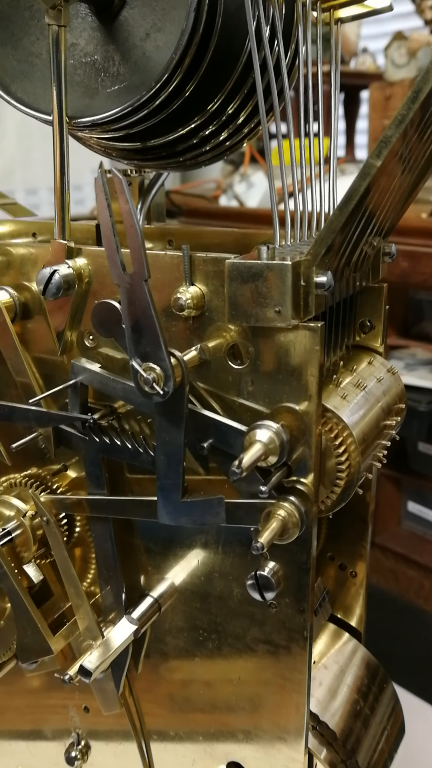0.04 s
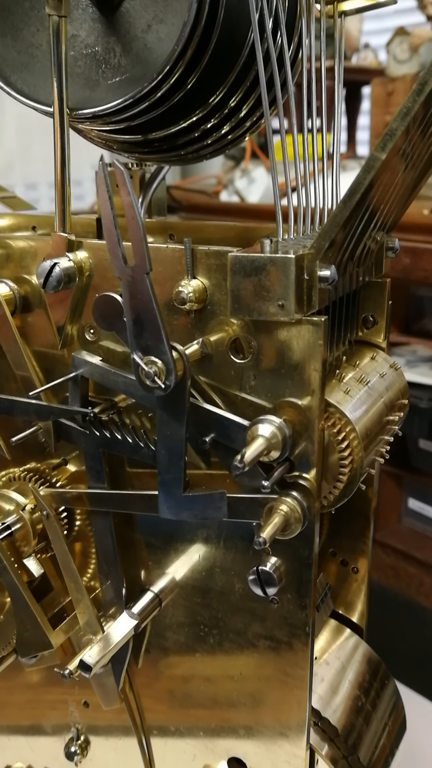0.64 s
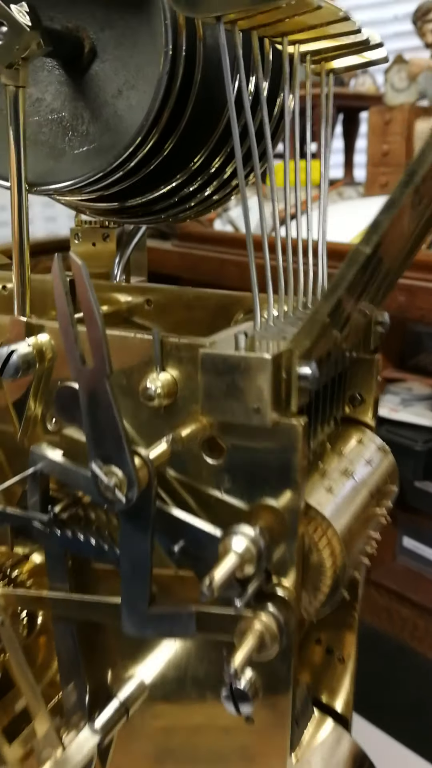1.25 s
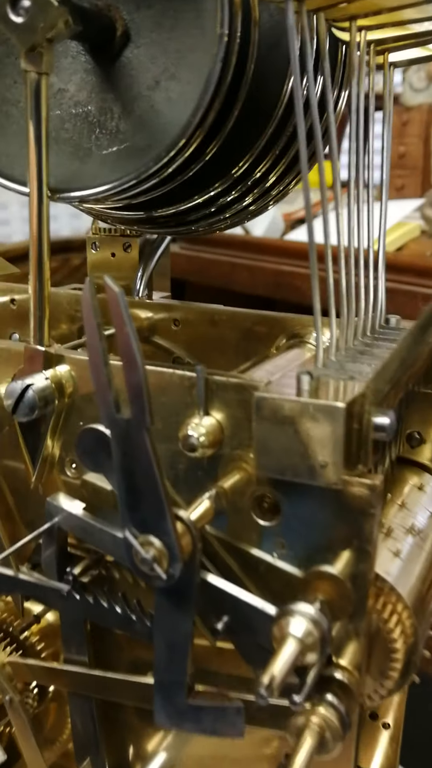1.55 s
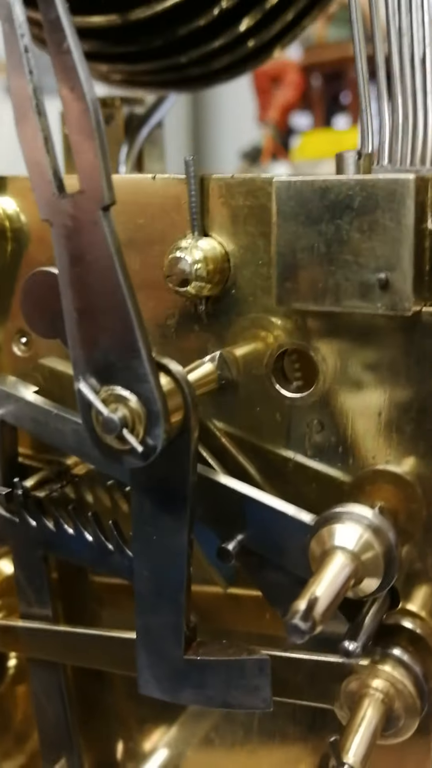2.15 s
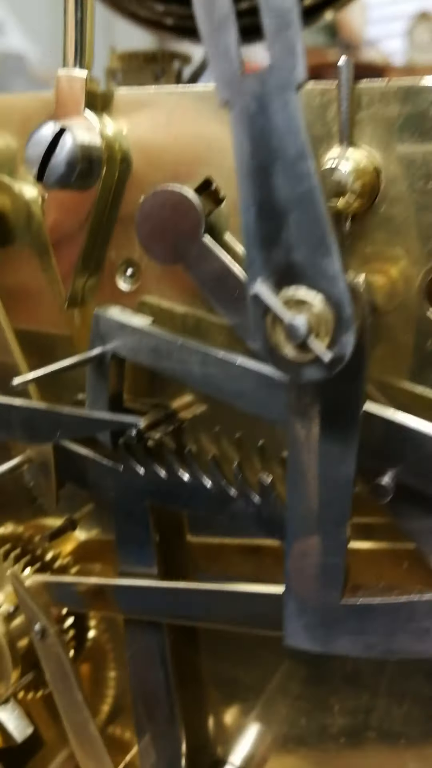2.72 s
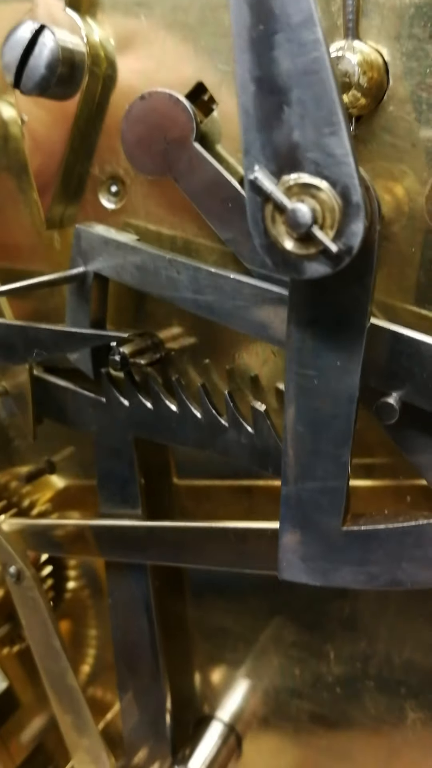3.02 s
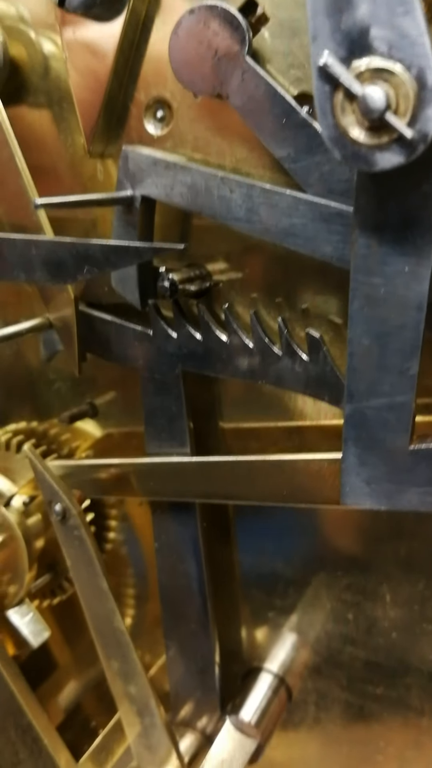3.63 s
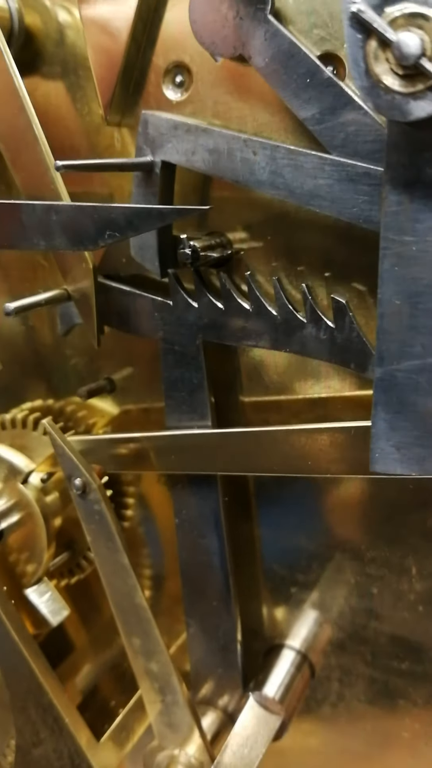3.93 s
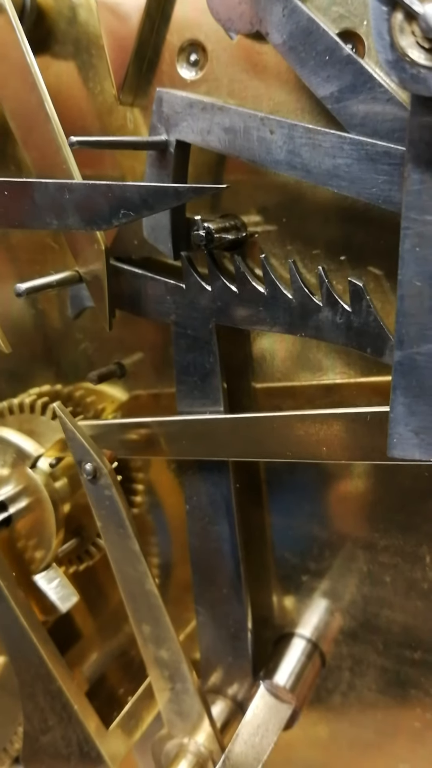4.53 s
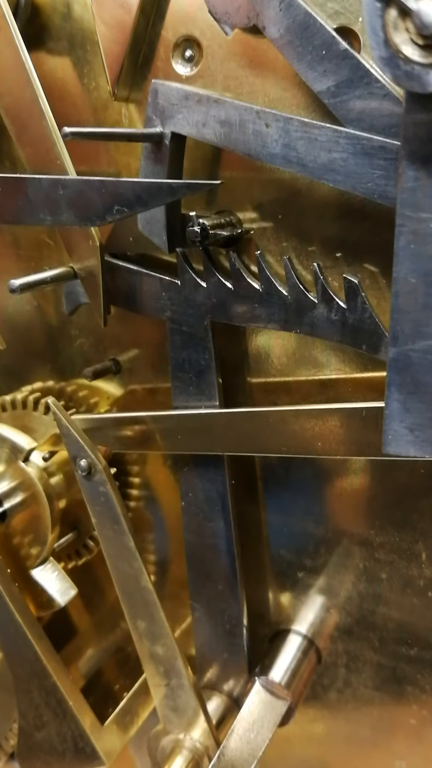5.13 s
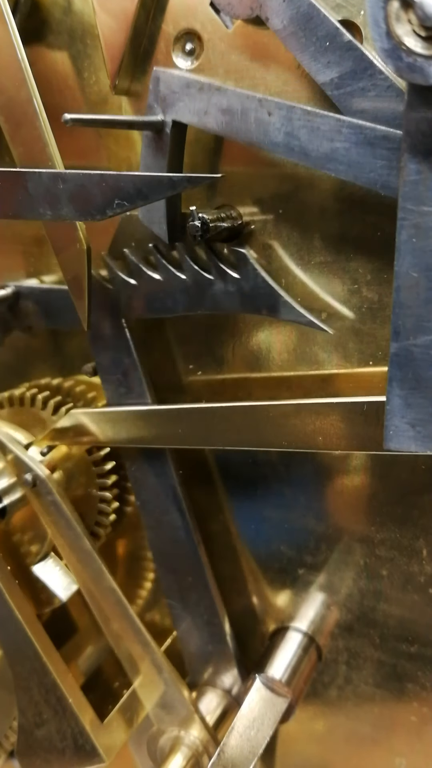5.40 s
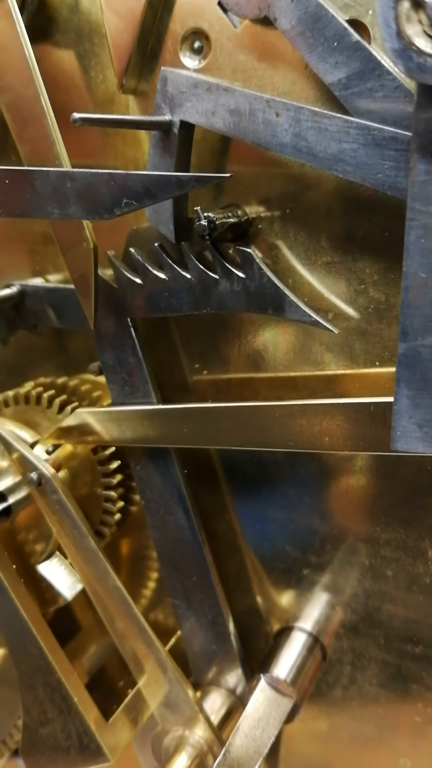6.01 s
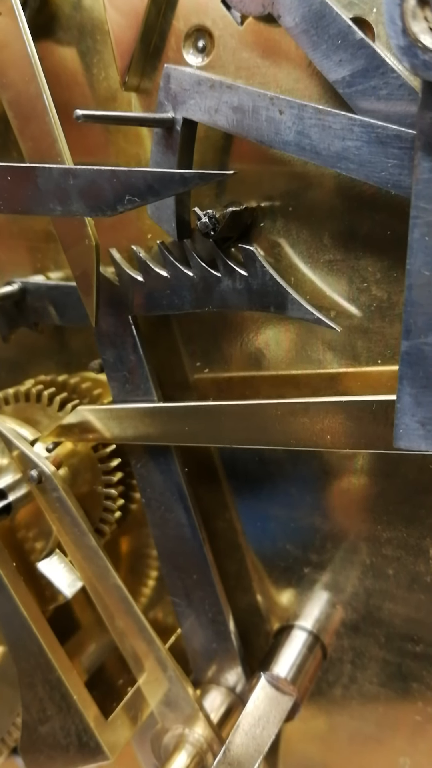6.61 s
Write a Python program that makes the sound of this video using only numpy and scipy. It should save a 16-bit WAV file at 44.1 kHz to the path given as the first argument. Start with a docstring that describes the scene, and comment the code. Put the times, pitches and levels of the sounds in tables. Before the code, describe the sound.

Close, slightly uneven tick and tock from a mechanical clock movement runs throughout, over the soft rumble, hiss and faint hum of a quiet workshop. A hand brushes the microphone and bumps it lightly several times. Then comes the loudest event, a hard steel clack and a brief ringing rattle as a part falls and bounces. Very quiet whirring gears and two smaller metallic clicks follow.

```python
"""A brass chiming-clock movement ticks on a bench in a quiet workshop, a hand's width from the microphone.
Each tooth of the escape wheel rings a pallet and rattles the plates and levers. The microphone moves in
on the steel rack, which is released, drops and bounces; the wheel train spins up with its whirring fly
and two levers click over. The hand holding the stereo microphone slides and knocks softly on its case.
Behind it all lie the room's low rumble, hiss and a faint mains hum."""
import sys
import numpy as np
from scipy import signal
from scipy.fft import rfft, irfft, next_fast_len
from scipy.io import wavfile

SR = 44100
rng = np.random.default_rng(int(sys.argv[2]) if len(sys.argv) > 2 else 0)


def waveform_to_disk(signal):
    """Save audio, clipped to [-1, 1], as 16-bit WAV at the path in sys.argv[1]."""
    frames = np.transpose(np.atleast_2d(signal))
    scaled = np.clip(frames, -1, 1) * 32767
    samples = np.round(scaled).astype(np.int16)
    wavfile.write(sys.argv[1], SR, samples)


N = 298116
TIME = np.arange(N) / SR
AGE = TIME[:SR // 2]  # seconds since a blow

# the lifting lever clicks over: start_s, level_db, pan_db, tilt_db_per_octave, t60_s
LIFTING_CONTACT = [(6.2450, -30, 3.0, 0.3, 0.03)]


def escapement():
    """Tick and tock alternate, slightly out of beat; the two pallets shake the same parts unequally."""
    # how hard the tooth lands on the entry (tick) and exit (tock) pallet, swing by swing: force_db
    tick_forces = [2.5, -10.5, 0, 1.5, -1, 0, -1.5]
    tock_forces = [-2, -1, 2, 0.5, -1, -1, -8]
    # plate rattle after each pallet: frequency_hz, level_db
    tick_rattle = [(700, -13), (1700, -2), (2120, 4.5), (2700, -15), (3250, -8.5), (3850, 17), (4450, -7),
                   (5850, -2), (6450, -16.5), (7200, 3), (8200, -3), (11000, -3), (13200, -7), (15000, -5),
                   (15800, -17)]
    tock_rattle = [(700, -5), (1450, 8), (1800, -1), (2280, 5), (2750, -9.5), (3500, 2), (3960, 7.5),
                   (4450, -8), (5900, 5), (6400, -14), (7100, -0.5), (10500, -3), (12800, -3), (13700, -15),
                   (15000, -8), (15800, -25)]
    # modes of the steel levers and of freely hanging parts: pitch_hz, tick_db, tock_db, t60_s
    lever_modes = [(850, -67, -68, 0.3), (1415, -75, -63, 0.28), (2040, -78, -61, 0.22),
                   (2131, -57.5, -61, 0.12), (2293, -63.5, -54, 0.056), (4000, -54.5, -59.5, 0.22),
                   (5770, -51.5, -63, 0.11), (5857, -46.5, -46.5, 0.11), (7120, -63, -61, 0.17),
                   (7370, -64, -61, 0.16), (8700, -62, -59, .1), (9460, -62.5, -66, 0.25),
                   (9520, -56, -61, 0.12), (10140, -66, -77, .16), (10480, -61, -53, 0.11),
                   (10800, -55, -56, 0.071), (11500, -72, -66, 0.16), (11980, -66, -56, .08),
                   (12200, -60, -71, 0.11), (12660, -70, -57, 0.12), (13058, -49, -61, 0.11),
                   (13430, -60, -68, 0.092), (14210, -71, -62, 0.12), (14490, -62, -80, .14),
                   (15110, -65, -63, 0.12)]
    hanging_modes = [(169.6, -56.5, -63, 0.69), (5770, -58, -63, 0.35)]
    short, long = np.array(lever_modes), np.array(hanging_modes)
    tick_columns, tock_columns = [0, 1, 3], [0, 2, 3]
    first_tick_s, tock_after_s = .4503, .4688
    tick = beats(first_tick_s, tick_forces, tick_rattle, short[:, tick_columns], long[:, tick_columns],
                 late_s=.0028, ring_db=-24.5, pan_db=-16, rattle_db=-46.8, rattle_t60=.1,
                 rebound_s=.008, rebound_db=-5.5, spring_db=-4, close_spring_db=-3)
    tock = beats(first_tick_s + tock_after_s, tock_forces, tock_rattle,
                 short[:, tock_columns], long[:, tock_columns],
                 late_s=0, ring_db=-38.5, pan_db=-11, rattle_db=-53, rattle_t60=.12,
                 rebound_s=.012, rebound_db=-4.5, spring_db=-2, close_spring_db=13.5)
    return tick + tock


def beats(first_s, forces_db, rattle_colour, lever_modes, hanging_modes, late_s, ring_db, pan_db,
          rattle_db, rattle_t60, rebound_s, rebound_db, spring_db, close_spring_db, swing_s=.9604):
    """Once a pendulum swing a tooth rings the pallet; the blow spreads through plates and levers."""
    # the microphone moves in on the rack: time_s, closeness (0 to 1)
    approach = [(1.5, 0), (3.7, .65), (4.5, 1)]
    # a thin return spring: pitch_hz, level_db, t60_s
    spring_mode = [(4770, -68, .36)]
    out = np.zeros((2, N))
    landing = decay(rattle_t60, rise_s=.0012)
    rebound = from_db(rebound_db) * np.interp(AGE - rebound_s, AGE, landing)
    envelope = np.hypot(landing, rebound) + from_db(-19.5) * decay(.35, rise_s=.0076)
    for swing, force_db in enumerate(forces_db):
        s = first_s + swing * swing_s + late_s * (swing % 2)  # uneven wheel: every second tooth is late
        close = np.interp(s, *np.transpose(approach))
        pallet = from_db(ring_db + force_db) * panned(pan_db) * pallet_ring(rebound_s, rebound_db)
        # each part follows the force and the microphone's closeness to its own degree
        plates = noise(rattle_colour, len(AGE)) * envelope
        plates *= from_db(rattle_db + .25 * force_db + 2.5 * close)
        clink = ring(lever_modes, rise_s=.0035, scatter_db=2.2)
        clink *= from_db(-.8 + .6 * force_db + 2.5 * close)
        hanging = ring(hanging_modes, rise_s=.012, scatter_db=2.5)
        hanging *= from_db(1.8 + .9 * force_db - 7.5 * close)
        spring = ring(spring_mode, rise_s=.009, scatter_db=0)
        spring *= from_db(spring_db + force_db + close_spring_db * close ** 3)
        add(out, s, pallet + panned(-1) * (plates + clink + hanging + spring))
    return out


def pallet_ring(rebound_s, rebound_db):
    """A tooth lands on the pallet and rebounds once, which makes the short ring throb."""
    # the pallet's own modes: pitch_hz, level_db, t60_s
    modes = [(3968, 2, 0.037), (3866, -10.5, 0.045)]
    first = ring(modes, rise_s=.0044, scatter_db=-.54, phase_spread=0)
    second = np.pad(first, ((0, 0), (int(rebound_s * SR), 0)))[:, :len(AGE)]
    damping = np.exp(-np.maximum(AGE - rebound_s, 0) / .0015)  # the second contact stops the first ring
    return first * damping + from_db(rebound_db) * second


def rack():
    """The light hook slips off with a hard clack; the heavy rack lands and shakes the whole movement."""
    # the hook lets go: start_s, level_db, pan_db, tilt_db_per_octave, t60_s
    release = [(5.4143, -10.7, 1, 1.3, 0.018), (5.4155, -14, -4, -0.5, 0.015)]
    # the crack of each part: frequency_hz, level_db
    hook_colour = [(150, -34), (1100, -19), (1500, 1), (2250, 0), (2700, -5), (3300, -6), (4200, -19),
                   (5400, -16.5), (7000, -0.5), (8400, 2), (9800, -2.5), (11000, -18), (13500, -14),
                   (15300, -18)]
    rack_colour = [(150, -35), (500, -17.5), (1000, -1), (1550, -7), (2450, 4), (2800, -3.5), (3300, -0.5),
                   (5400, -7), (7000, -2.5), (9000, 2), (11000, -7.5), (13500, -5.5), (15000, 0),
                   (16000, -10)]
    # what each part sets ringing: pitch_hz, level_db, t60_s
    hook_modes = [(1500, -8.5, .04), (2060, -6.5, 0.037), (2296, -5, .035), (3250, -13, 0.06),
                  (6900, -11, .03), (8300, -4, .035), (9080, -12, 0.036)]
    rack_modes = [(254, -31.5, 0.69), (298, -32, 0.3), (650, -30.5, 0.35), (870, -27, .16),
                  (1005, -27, .25), (1059, -25, .2), (1378, -29, 0.73), (1493, -25.5, .13),
                  (1570, -25, 0.18), (1480, -22, 0.14), (1625, -21.5, .16), (1710, -24, .16),
                  (1981, -18.5, .16), (2020, -19, .15), (2430, -20, .12), (2485, -17, .13),
                  (2700, -23, .12), (2840, -25, .14), (3140, -27, .14), (3260, -27, 0.13), (3340, -21, .16),
                  (3700, -22, .15), (3876, -19, .11), (6500, -28, .14), (7100, -21, .12), (7400, -31, .12),
                  (8200, -27, .13), (7880, -20, .13), (9055, -16.5, .1), (11520, -23, .11),
                  (15080, -16, .07)]
    hook = strike(release, hook_colour, hook_modes, frame_db=-24.5, modes_db=-8.5, bench_db=-55)
    drop = strike(bounces(), rack_colour, rack_modes, frame_db=-18.5, modes_db=-7, bench_db=-28)
    return hook + drop


def bounces(graze_lead_s=.0027, chatter_gap_s=.0125, chatter_loss_db=13.5):
    """At each landing a pin grazes, the rack hits and loose parts chatter; then it shivers to rest."""
    # the rack lands: start_s, level_db
    landings = [(5.4391, -13.8), (5.4818, -17.4), (5.5283, -23)]
    first_db = landings[0][1]
    settle_s, settle_gap_s = 5.548, .0055
    contacts = []
    for s, db in landings:
        graze_db = first_db - 9.5 + 1.8 * (db - first_db)  # a softer landing is grazed far more softly
        contacts.append(contact(s - graze_lead_s, graze_db, t60=.028, tilt_db=1.6, pan_db=1.5))
        contacts.append(contact(s, db, t60=.026, tilt_db=-.2, pan_db=.6))
        for k in (1, 2):
            contacts.append(contact(s + k * chatter_gap_s, db - k * chatter_loss_db, t60=.02, tilt_db=.8))
    shiver = [contact(settle_s + k * settle_gap_s, db=-33, t60=.05, tilt_db=-.8) for k in range(5)]
    return contacts + shiver


def contact(s, db, t60, tilt_db, pan_db=0):
    """One touch of steel on steel, as a row for strike()."""
    return s, db, pan_db, tilt_db, t60


def strike(contacts, colour, modes, frame_db, modes_db, bench_db):
    """Steel hits steel: a hard crack, then the frame rings on and the bench under it booms."""
    # the shaken frame and the bench: frequency_hz, level_db
    frame_colour = [(90, -28.5), (170, -15), (260, -2), (480, -13.5), (750, -12.5), (1020, 2),
                    (1250, -10.5), (1550, 6), (2300, -2), (3400, 3.5), (5300, -8.5), (8500, -2.5),
                    (11500, -13.5), (15500, -19.5)]
    bench_colour = [(70, -41), (170, -4.5), (290, -4.5), (450, -10.5), (800, -13.5), (1600, -16.5),
                    (4000, -20.5), (15000, -47)]
    # left against right: frequency_hz, correlation
    crack_likeness = [(500, .52), (2200, .45), (5000, .11), (13000, -.26)]
    frame_likeness = [(200, .61), (1500, .13), (8000, .05)]
    bench_likeness = [(200, .71), (1000, .23)]
    out = np.zeros((2, N))
    for s, db, pan_db, tilt_db, t60 in contacts:
        crack = noise(colour, len(AGE), crack_likeness, tilt_db) * decay(t60, rise_s=.00066)
        frame = from_db(frame_db) * noise(frame_colour, len(AGE), frame_likeness) * decay(.22, .0023)
        bench = from_db(bench_db) * noise(bench_colour, len(AGE), bench_likeness) * decay(.44, .021)
        ringing = from_db(modes_db) * ring(modes, rise_s=.00043, scatter_db=3.5)
        add(out, s, from_db(db) * (panned(pan_db) * crack + frame + bench + ringing))
    return out


def levers():
    """The lifting lever and then the warning lever click over as the train runs, each with its own ring."""
    # the warning lever touches twice: start_s, level_db, pan_db, tilt_db_per_octave, t60_s
    warning_contacts = [(6.6800, -45.5, 0.075, -1, 0.045), (6.6840, -34, .5, -1.2, 0.034)]
    # the crack of either lever: frequency_hz, level_db
    colour = [(150, -25), (700, -11.5), (1200, -4.5), (2300, -2), (3000, -7), (4300, 1.5), (5300, -9),
              (6300, -4), (8600, 1.5), (11000, -3), (13300, -4), (15500, -15)]
    # what each lever sets ringing: pitch_hz, level_db, t60_s
    lifting_modes = [(653, -12.5, 0.2), (738, -10, 0.12), (1630, -14, .12), (7700, -13, .08),
                     (8800, -12, .08), (9458, -17, 0.12)]
    warning_modes = [(265, -25, .25), (412, -18, 0.41), (877, -14.5, .16), (1400, -15, .14),
                     (2400, -8.5, 0.06), (4600, -13.5, .08), (6350, -18, .07)]
    lifting = strike(LIFTING_CONTACT, colour, lifting_modes, frame_db=-20, modes_db=-7, bench_db=-28)
    warning = strike(warning_contacts, colour, warning_modes, frame_db=-15.5, modes_db=-4, bench_db=-30)
    return lifting + warning


def wheel_train(start_s=5.9385):
    """The train spins up until the fly holds its speed; a tooth clicks each turn, louder under load."""
    # a tooth's click: frequency_hz, level_db
    tooth_colour = [(1500, -8.5), (2800, -14), (3900, -4), (4400, -16), (5100, -4), (6500, -25),
                    (8700, 1.5), (10200, -17), (15000, -26)]
    start_hz, top_hz, spin_up_hz_per_s = 30.3, 42, 48  # rate of turning
    first_tooth_db, load_db_per_s, free_tooth_db = -60, 33, -69
    running = TIME >= start_s
    turn_hz = np.clip(start_hz + spin_up_hz_per_s * (TIME - start_s), start_hz, top_hz)
    turns = np.cumsum(turn_hz * running) / SR
    out = running * fly(turns, turn_hz / top_hz)
    envelope = decay(.03, rise_s=.00063)[:2048]
    for s in TIME[1:][np.diff(np.ceil(turns)) > 0]:
        raising_lever = s < LIFTING_CONTACT[0][0]
        db = first_tooth_db + load_db_per_s * (s - start_s) if raising_lever else free_tooth_db
        db += 2.5 * rng.standard_normal()
        add(out, s, from_db(db) * noise(tooth_colour, len(envelope)) * envelope)
    return out


def fly(turns, share_of_top_speed, squeak_hz=1814, fall_hz=280, flutter_db=5, db_per_doubling=22):
    """The fly whirs and gives a falling squeak on every turn, growing louder with speed."""
    # the whir: frequency_hz, level_db
    whir_colour = [(900, -15.5), (1550, -11.5), (1820, -2), (2100, -16.5), (5000, -20.5), (9000, -22),
                   (15000, -33.5)]
    within_turn = turns % 1
    strength = from_db(.5 + 3.5 * rng.standard_normal(400))[turns.astype(int)]  # new on each turn
    pitch_hz = squeak_hz - fall_hz * (within_turn - .5)
    phase = 2 * np.pi * np.cumsum(pitch_hz) / SR + np.array([[0], [np.pi / 2]])
    squeak = strength * np.sin(np.pi * within_turn) ** 2 * np.sin(phase)
    whir = from_db(-2 - flutter_db * np.cos(2 * np.pi * turns)) * noise(whir_colour, N)
    return from_db(-69 + db_per_doubling * np.log2(share_of_top_speed)) * (whir + squeak)


def finger_knocks(hard_width_s=.0004, softening=.12, port_lag_s=.00089):
    """A knock flexes the microphone's case out and back, more slowly when soft, and sets it ringing."""
    # fingers on the case: time_s, level_db
    knocks = [(2.1494, -35.5), (2.2478, -38), (2.3028, -25), (2.3396, -28), (2.4214, -38), (2.548, -50),
              (2.8906, -30.5), (3.132, -32), (4.3568, -32.5)]
    # the case's modes: pitch_hz, level_db, t60_s
    case_modes = [(280, -34, 0.015), (560, -22, 0.022), (690, -18, 0.045)]
    out = np.zeros((2, N))
    hardest_db = max(db for s, db in knocks)
    for s, db in knocks:
        width_s = hard_width_s * from_db(softening * (hardest_db - db))
        offset_s = TIME[int(s * SR) - SR // 100:][:len(AGE)] - s  # begins 10 ms ahead of the knock
        widths = offset_s / width_s
        flex = widths * np.exp((1 - widths ** 2) / 2)
        age = np.maximum(offset_s, 0)
        case = sum(from_db(level - 60 * age / t60) * np.sin(2 * np.pi * hz * age)
                   for hz, level, t60 in case_modes)
        add(out, s - .01, -from_db(db) * (flex + case))
    case_band = signal.butter(2, [170, 1300], "band", fs=SR, output="sos")  # it passes the low middle
    out = signal.sosfilt(case_band, out)
    out[1] = from_db(-9) * np.interp(TIME - port_lag_s, TIME, out[0])  # far port: later and softer
    return out


def sliding_skin(grip_db=-78.5):
    """Skin hisses on the microphone's case: each stroke swells and eases off over the resting grip."""
    # the hand slides: start_s, rise_s, peak_db
    strokes = [(0.98, .18, -61.3), (1.3, .3, -73), (2.1, .28, -68.5)]
    # the skin's hiss: frequency_hz, level_db
    colour = [(1500, -12.5), (4000, -8.5), (6000, -7), (8000, -1), (9500, -4.5), (11000, -16),
              (15500, -25.5)]
    power = from_db(grip_db) ** 2
    for s, rise_s, db in strokes:
        progress = np.maximum(TIME - s, 0) / rise_s
        swell = (progress * np.exp(1 - progress)) ** 2
        power = power + (from_db(db) * swell) ** 2
    return np.sqrt(power) * noise(colour, N)


def fingernail(start_s=2.3014, level_db=-37.5):
    """A nail catches on the case with a tiny snap just ahead of the hardest knock."""
    colour = [(500, 10), (3000, -3), (9000, -4), (15000, -23)]  # frequency_hz, level_db
    out = np.zeros((2, N))
    add(out, start_s, from_db(level_db) * noise(colour, len(AGE)) * decay(.01, rise_s=.000091))
    return out


def workshop(air_db=-63.5, hum_hz=399):
    """Room tone: low rumble, alike at both ports, and hiss, with a faint hum and two fading tones."""
    # the room's air: frequency_hz, level_db
    air_colour = [(12, -35), (20, -1), (74, -2.5), (193, -8.5), (228, -14), (399, -21), (434, -22.5),
                  (485, -24.5), (542, -23.5), (1150, -18), (2390, -27.5), (2990, -25.5), (4060, -28.5),
                  (9400, -35), (16000, -35)]
    # the air, left against right: frequency_hz, correlation
    air_likeness = [(30, .999), (80, .992), (170, .93), (400, .68), (1000, .45), (2500, .25), (10000, .1)]
    # faint tones: pitch_hz, rms_db, fade_db_per_s
    faint_tones = [(1960, -79.5, 3), (2070, -79.5, 7)]
    # mains hum, changing as the microphone moves: time_s, rms_db
    hum_levels = [(0, -78), (1.5, -82), (2.8, -77.5), (5, -76.5), (6.76, -75)]
    tones = sum(from_db(db - fade * TIME) * tone(hz) for hz, db, fade in faint_tones)
    hum = from_db(np.interp(TIME, *np.transpose(hum_levels))) * tone(hum_hz)
    return from_db(air_db) * noise(air_colour, N, air_likeness) + tones + hum


def tone(hz):
    """A steady sine of rms 1 that arrives a quarter cycle apart at the microphone's two ports."""
    return np.sqrt(2) * np.sin(2 * np.pi * (hz * TIME + rng.random()) + np.array([[0], [np.pi / 2]]))


def ring(modes, rise_s, scatter_db, phase_spread=1):
    """Struck modes, each with a strength of its own and about a quarter cycle between the two ports."""
    out = np.zeros((2, len(AGE)))
    for hz, db, t60 in modes:
        age = AGE[AGE < t60]
        gain = from_db(db + scatter_db * rng.standard_normal((2, 1)))
        apart = rng.choice([-1, 1]) * np.pi / 2 + rng.normal(0, .3)
        phase = 2 * np.pi * phase_spread * rng.random() + np.array([[0], [apart]])
        out[:, :len(age)] += gain * np.sin(2 * np.pi * hz * age + phase) * from_db(-60 * age / t60)
    return out * (1 - np.exp(-AGE / rise_s))


def noise(colour, size, likeness=((100, 0), (10000, 0)), tilt_db=0):
    """Stereo noise of rms 1 with a given colour, left-right correlation and treble tilt per octave."""
    fft_size = next_fast_len(size)
    hz = np.fft.rfftfreq(fft_size, 1 / SR) + 1
    level_db, alike = (np.interp(np.log(hz), np.log(curve[:, 0]), curve[:, 1])
                       for curve in (np.array(colour), np.array(likeness)))
    mid, side = rfft(rng.standard_normal((2, fft_size)))
    spectrum = np.sqrt(1 + alike) * mid + np.sqrt(1 - alike) * side * [[1], [-1]]
    spectrum *= from_db(level_db + tilt_db * np.log2(1 + hz / 1000))
    sound = irfft(spectrum)[:, :size]
    return sound / sound.std()


def decay(t60, rise_s):
    """Envelope that swells briefly and dies away."""
    return (1 - np.exp(-AGE / rise_s)) * from_db(-60 * AGE / t60)


def from_db(db):
    """Decibels to gain."""
    return 10 ** (np.asarray(db) / 20)


def panned(db):
    """Two gains of unit mean power, the left db above the right."""
    gains = from_db([[db / 2], [-db / 2]])
    return gains / np.sqrt(np.mean(gains ** 2))


def add(out, start_s, sound):
    """Mix a sound in at a time."""
    at = int(start_s * SR)
    out[:, at:at + sound.shape[-1]] += sound[..., :N - at]


def scene():
    """The clock close up, handling noise on the microphone and the room behind."""
    clock = escapement() + rack() + levers() + wheel_train()
    handling = finger_knocks() + sliding_skin() + fingernail()
    return clock + handling + workshop()


def record(dry):
    """The top is cut steeply above 16.2 kHz."""
    return signal.sosfilt(signal.ellip(10, .2, 80, 16200, fs=SR, output="sos"), dry)


dry = scene()
out = record(dry)
waveform_to_disk(out)
```